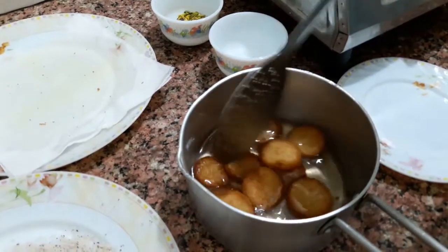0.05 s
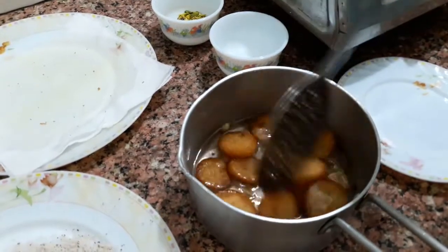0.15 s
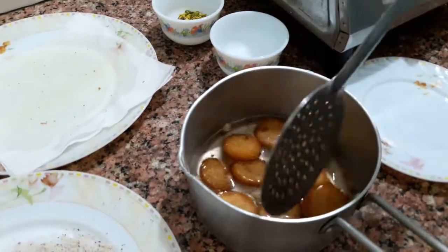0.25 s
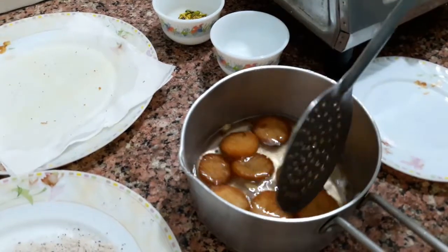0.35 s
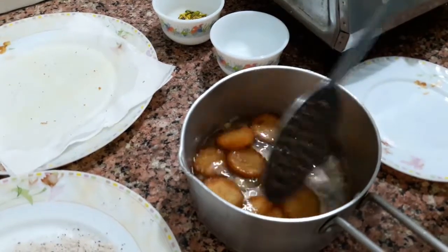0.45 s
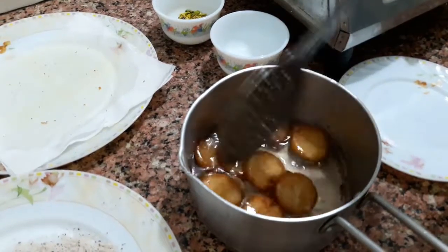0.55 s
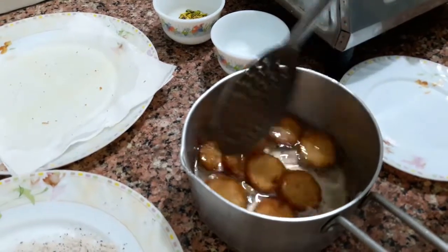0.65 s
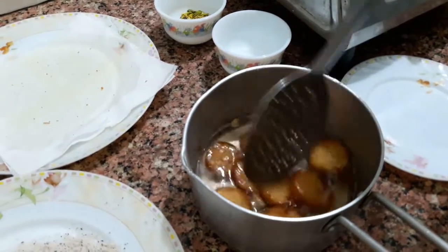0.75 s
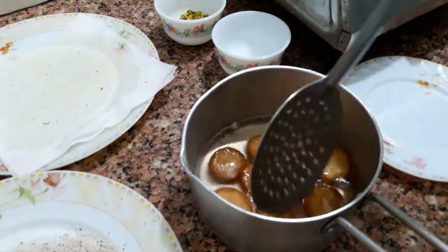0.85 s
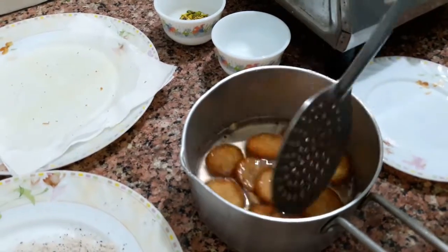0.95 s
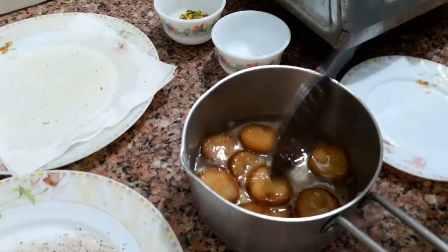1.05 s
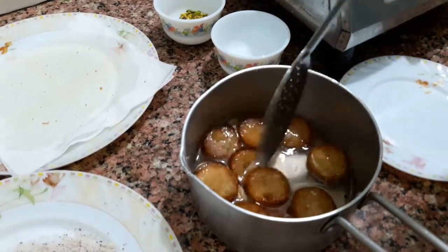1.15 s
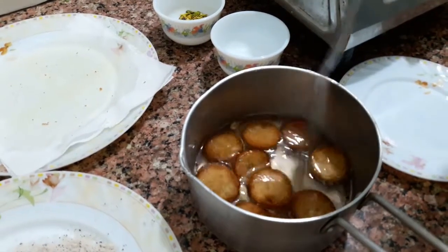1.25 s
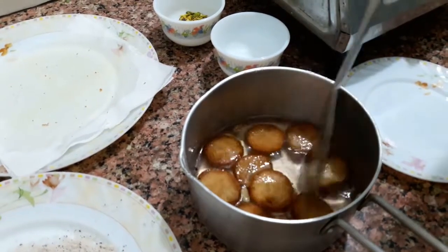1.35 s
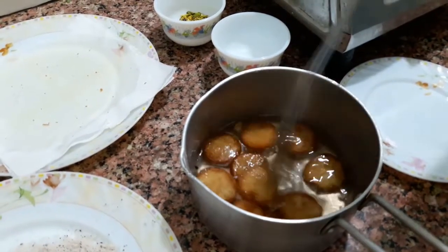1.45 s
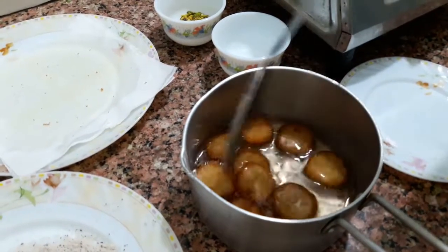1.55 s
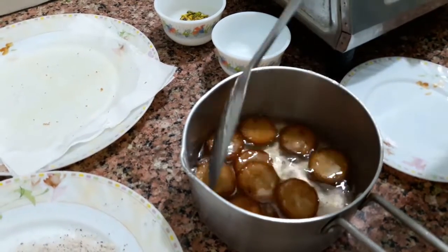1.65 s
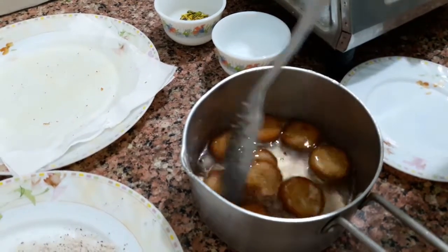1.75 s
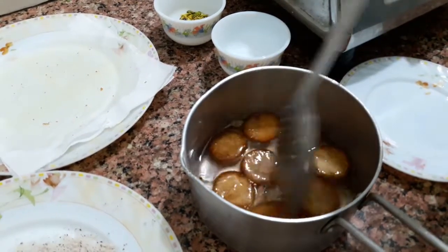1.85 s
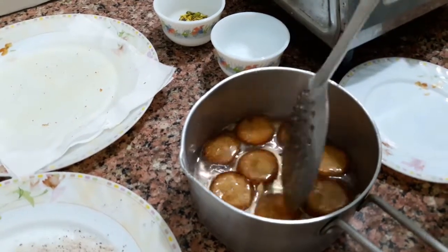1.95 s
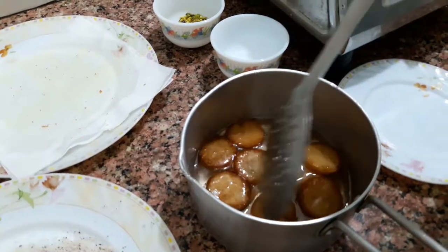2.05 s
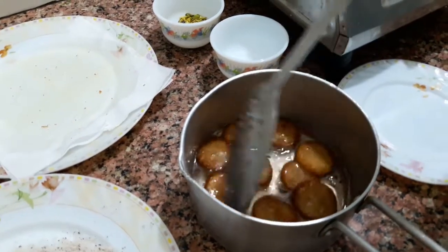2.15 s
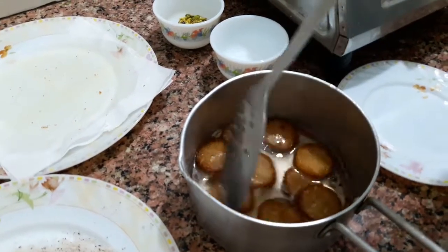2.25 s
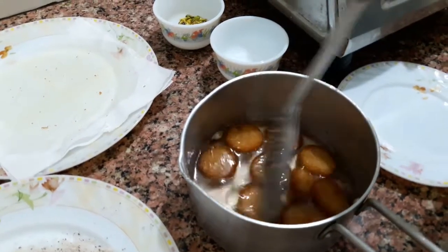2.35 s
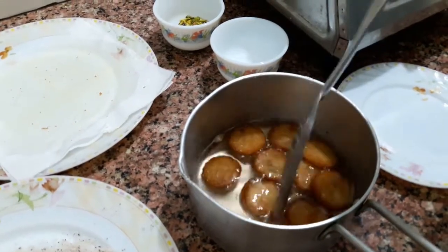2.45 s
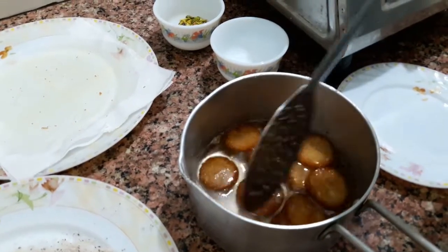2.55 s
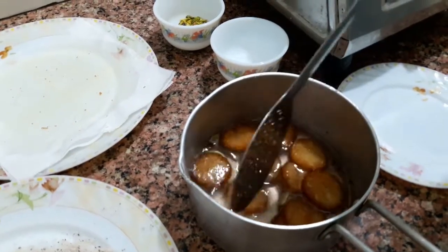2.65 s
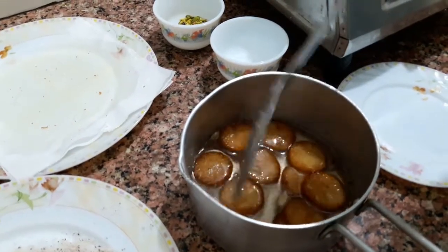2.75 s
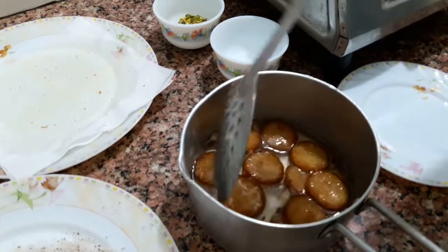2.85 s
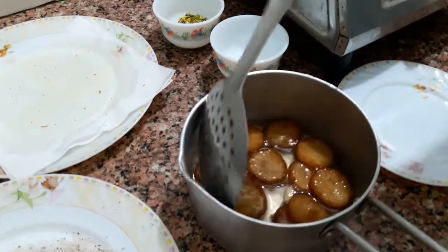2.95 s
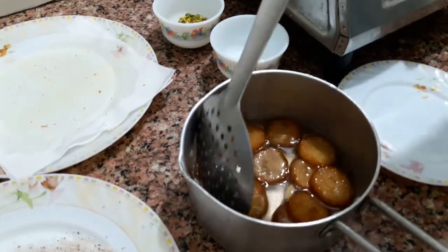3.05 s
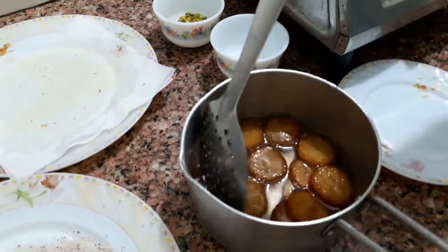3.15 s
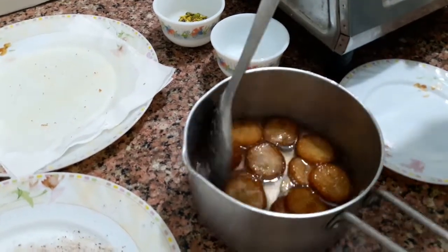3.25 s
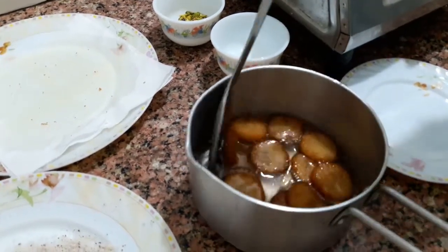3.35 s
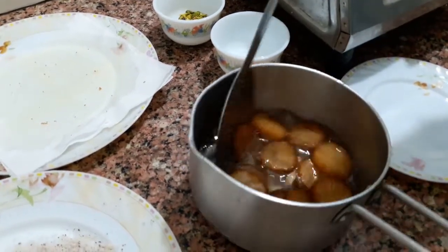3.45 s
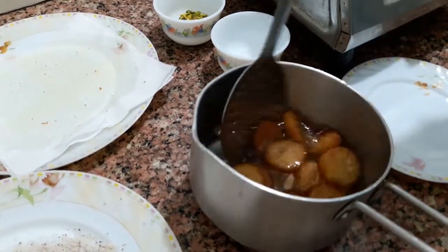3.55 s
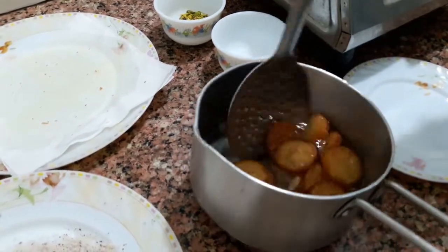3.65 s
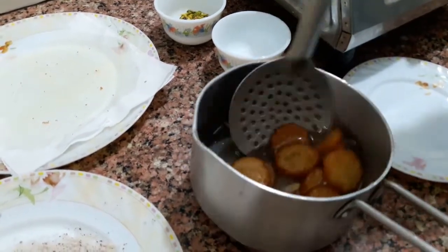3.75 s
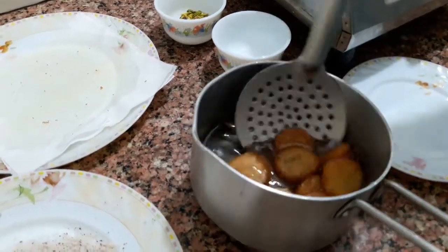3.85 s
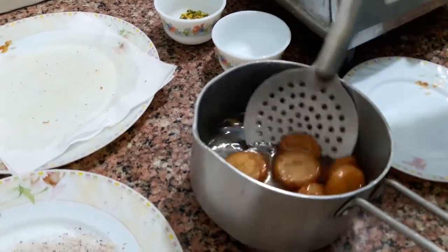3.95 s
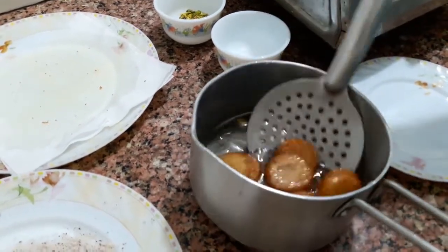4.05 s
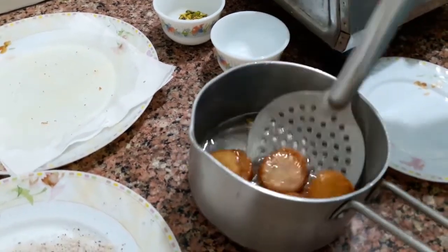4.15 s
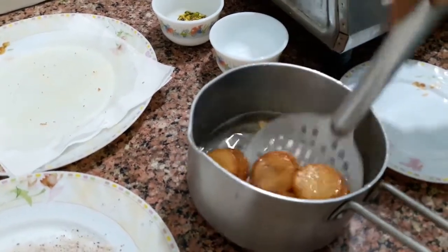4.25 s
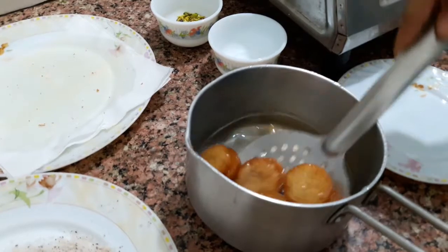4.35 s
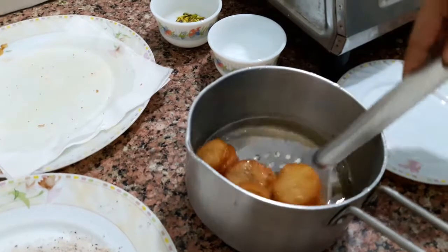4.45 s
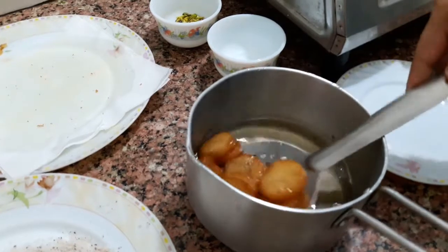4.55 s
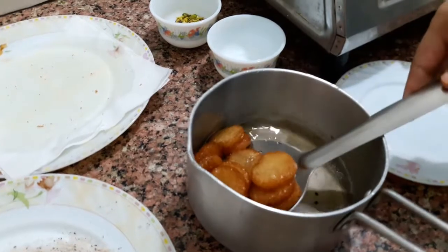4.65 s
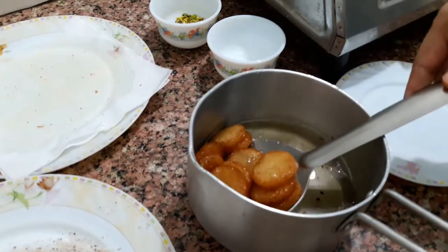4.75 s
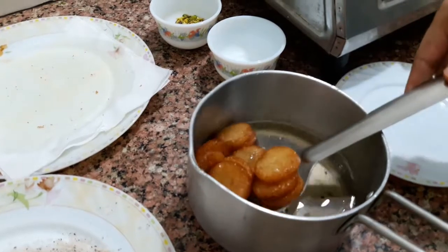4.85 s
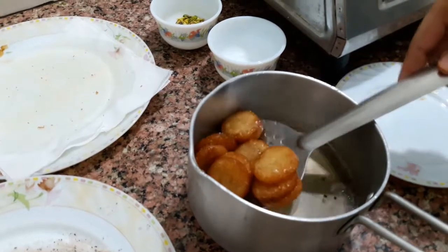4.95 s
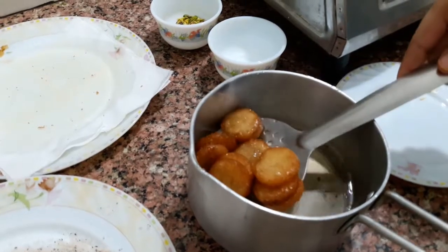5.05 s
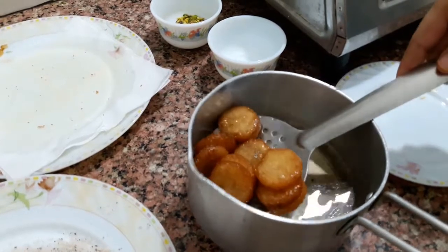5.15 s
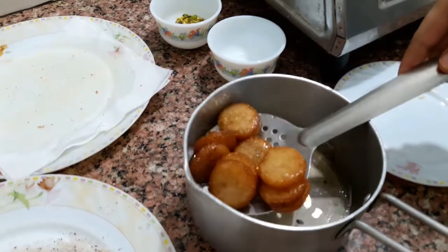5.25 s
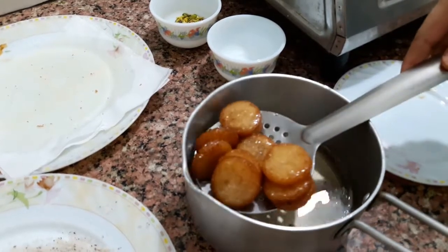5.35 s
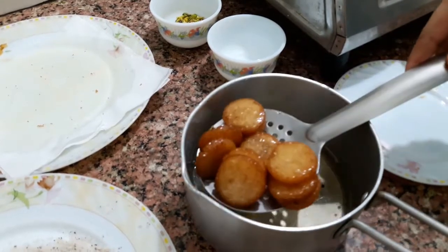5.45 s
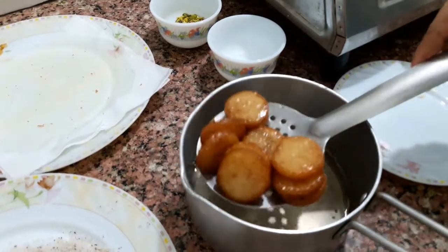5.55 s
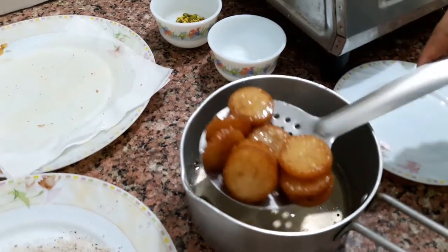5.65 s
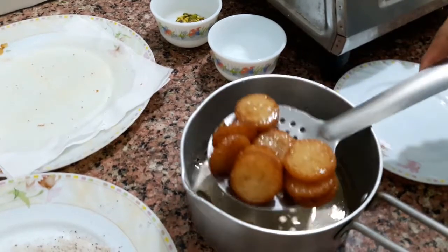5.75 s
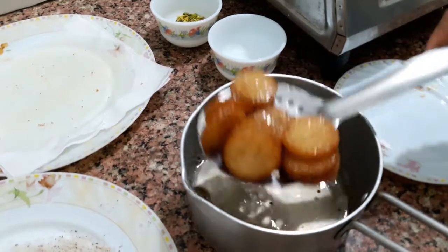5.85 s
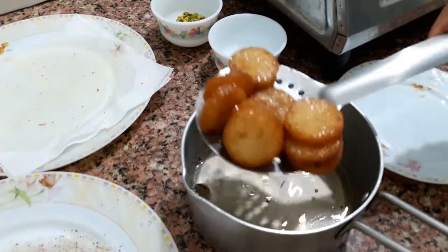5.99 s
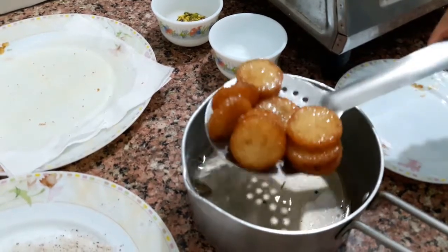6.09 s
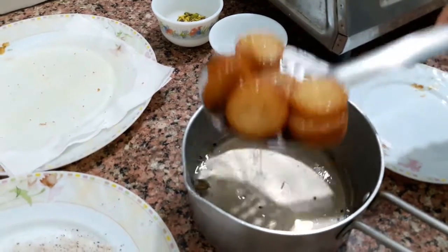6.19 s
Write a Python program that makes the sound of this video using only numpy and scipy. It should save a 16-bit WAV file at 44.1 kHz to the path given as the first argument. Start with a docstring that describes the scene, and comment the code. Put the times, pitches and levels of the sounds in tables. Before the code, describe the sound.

Light metallic taps and duller knocks in a syrupy pan, one bright clang, a grinding metal scoop, then a tick and tiny drips.

```python
"""In a small kitchen, a slotted steel skimmer nudges fried sweets around a saucepan of syrup.
It tinkles on the side, knocks on the bottom, clangs once on the wall and scrapes up the sweets.
Blows are noise cracks with dying modes; scraping is stick-slip clicks through resonances.
Syrup bubbles and drips are rising sines; filtered noise makes the air, wavering sines an appliance's hum.
"""
import sys
import numpy as np
from scipy import signal
from scipy.fft import rfft, irfft
from scipy.io import wavfile

SR = 44100
rng = np.random.default_rng(int(sys.argv[2]) if len(sys.argv) > 2 else 0)


def wav_record(signal):
    """Record a signal, one row per channel, as 16-bit PCM in the file named by sys.argv[1]."""
    frames = np.transpose(np.atleast_2d(signal))
    bounded = np.clip(frames, -1, 1)
    # unit amplitude maps onto the largest positive 16-bit level
    quanta = np.round(bounded * 32767).astype(np.int16)
    wavfile.write(sys.argv[1], SR, quanta)


N = 274283
TIME = np.arange(N) / SR
SHORT = TIME[:SR * 2 // 3]  # time axis of one ring or echo


def gain_of(db):
    """Level law: decibels to amplitude."""
    return 10 ** (np.asarray(db) / 20)


def evened(x):
    """Normalisation: scales to rms 1."""
    return x / np.sqrt(np.mean(x ** 2) + 1e-20)


def read(points, hz):
    """Interpolation of a table along a logarithmic frequency axis."""
    f, value = np.transpose(points)
    return np.interp(np.log(hz + 1), np.log(f + 1), value)


def add(mix, s, sound):
    """Superposition: mixes a sound in at time s, cutting what falls outside."""
    start = round(s * SR)
    sound = sound[max(-start, 0):]
    part = mix[max(start, 0):][:len(sound)]
    part += sound[:len(part)]


def coloured(x, *spectra, size=4096):
    """Minimum-phase filtering: a causal filter whose gain is the sum of some dB spectra."""
    hz = abs(np.fft.fftfreq(size, 1 / SR))
    log_gain = np.log(gain_of(sum(read(points, hz) for points in spectra)))
    # the Hilbert transform of the log gain gives the phase
    response = np.exp(np.conj(signal.hilbert(log_gain)))
    impulse = np.fft.ifft(response).real[:size // 2]
    return signal.fftconvolve(x, impulse)[:len(x)]


def drift(rate_hz):
    """Low-passed noise: a random wander of rms 1, slower for a lower rate."""
    hz = np.fft.rfftfreq(N, 1 / SR)
    noise = rfft(rng.standard_normal(N))
    return evened(irfft(noise * np.exp(-(hz / rate_hz) ** 2), N))


def slips(per_s, spread_db):
    """Stick and slip: random clicks of either sign, with sizes spread upwards or downwards in dB."""
    size = gain_of(spread_db * np.minimum(rng.exponential(1, N), 4))
    happens = rng.random(N) < per_s / SR
    return evened(size * rng.choice([-1, 1], N) * happens)


def resonate(x, hz, width):
    """Resonance by heterodyning: a one-pole filter around the moving frequency hz."""
    turn = np.exp(2j * np.pi * np.cumsum(hz) / SR)
    r = np.exp(-np.pi * width / SR)
    return (turn * signal.lfilter([1 - r], [1, -r], x / turn)).real


# Colour of the steady air. Each row: frequency in Hz, gain in dB.
AIR_COLOUR = [(15, -66), (25, -28), (70, -16.5), (87, -3.5), (175, -5), (206, -17.5), (236, -8), (263, -18),
              (317, -2), (384, -14.5), (463, -9.5), (607, -15.5), (796, -12.5), (936, -11.5), (1020, -15.5),
              (1940, -19), (2110, -21), (3920, -35.5), (8590, -42.5), (12900, -44.5), (16000, -50)]
AIR_DB = -49.5  # rms before the slow drift


def air():
    """Broadband noise: a filtered rush whose level drifts a little."""
    rush = evened(coloured(rng.standard_normal(N), AIR_COLOUR, size=16384))
    return gain_of(AIR_DB) * rush * gain_of(.5 * drift(rate_hz=6.2))


# Tones of the appliance. Each row: mean frequency in Hz, middle of the wandering level in dB.
HUM_TONES = [(100, -61.5), (176, -58), (308, -61.5)]


def appliance_hum():
    """Frequency and amplitude modulation: sines that waver in pitch and level."""
    hum = np.zeros(N)
    for hz, db in HUM_TONES:
        level = gain_of(db + 1.4 * drift(rate_hz=12))
        pitch = hz + 5.36 * drift(rate_hz=14.4)
        hum += level * np.sin(2 * np.pi * np.cumsum(pitch) / SR)
    return hum


# Decay of the room. Each row: frequency in Hz, time to fall 60 dB in seconds.
ECHO_T60 = [(150, 0.452), (400, 0.56), (1500, 0.4), (4000, 0.36), (8000, 0.34), (14000, 0.22)]
# Strength of the echo. Each row: frequency in Hz, level in dB relative to the sound sent in.
ECHO_LEVEL = [(150, -0.5), (400, 5), (1200, -1), (3000, -3.5), (6000, -3.5), (12000, -3.5)]


def kitchen(x, first_s=0.0018):
    """Diffuse reverberation: dense reflections off counter and tiles, the high treble dying first."""
    hz, t, z = signal.stft(rng.standard_normal(len(SHORT)), SR, nperseg=256)
    decay = np.log(1000) / read(ECHO_T60, hz)[:, None]
    level = np.sqrt(2 * decay / SR) * gain_of(read(ECHO_LEVEL, hz))[:, None]
    z = z * np.exp(-decay * t) * level
    tail = signal.istft(z, SR, nperseg=256)[1][:len(SHORT)]
    # the echo fades in around the first reflection
    return signal.fftconvolve(x, tail * np.clip(SHORT / first_s - .5, 0, 1))[:N]


# The long slide: the skimmer presses steadily, eases off to a light touch, then leaves the pan.
PRESS_S, EASE_S, LIFT_S = 3.33, 4.35, 5.2  # when each stage begins
PRESS_RISE_S, EASE_FALL_S, LIFT_FALL_S = 0.026, 0.32, 0.11
PRESS_DB, TOUCH_DB, OFF_DB = -42, -54, -91


def pressure_db(t):
    """Friction grows with contact pressure: press, hold, ease off, lift."""
    stages = [PRESS_S, PRESS_S + PRESS_RISE_S, EASE_S, EASE_S + EASE_FALL_S,
              LIFT_S, LIFT_S + LIFT_FALL_S]
    return np.interp(t, stages, [OFF_DB, PRESS_DB, PRESS_DB, TOUCH_DB, TOUCH_DB, OFF_DB])


BUBBLE_CYCLES = 58  # a bubble falls 60 dB in this many starting periods, so small ones are brief


def bubble(hz, t60, rise=2.05, onset_s=0.00022):
    """Volume resonance: a bubble rings briefly, its pitch rising as it nears the surface."""
    t = SHORT[:SR // 8]
    fade = np.exp(-np.log(1000) * t / t60) * (1 - np.exp(-t / onset_s))
    return fade * np.sin(2 * np.pi * hz * (t + rise * t ** 2))


# The clearest bubbles. Each row: start in seconds, starting pitch in Hz, level in dB.
CLEAR_BUBBLES = [(0.738, 643, -36), (0.748, 856, -35), (1.845, 1580, -28), (2.686, 1483, -37),
                 (4.181, 1990, -30.5), (4.273, 1680, -26), (4.386, 3520, -32), (4.475, 826, -32),
                 (4.931, 3010, -26), (4.945, 1996, -23)]


def plops():
    """Damped bubble resonance: single bubbles in the syrup."""
    out = np.zeros(N)
    for s, hz, db in CLEAR_BUBBLES:
        add(out, s, gain_of(db) * bubble(hz, BUBBLE_CYCLES / hz))
    return out


# Small bubbles stirred up by the slide.
GURGLE_HZ, GURGLE_OCTAVES = 714, 2  # lowest starting pitch and range
GURGLE_DB = 7  # the loudest, relative to the pressure level
GURGLE_SPREAD_DB, GURGLE_DB_PER_OCTAVE = 2, -3.5


def gurgle(count=70):
    """Random superposition of small bubbles whose level follows the push of the skimmer."""
    out = np.zeros(N)
    for when, smallness, weakness in rng.random((count, 3)):
        s = PRESS_S + when * (LIFT_S - PRESS_S)
        octaves = GURGLE_OCTAVES * smallness
        hz = GURGLE_HZ * 2 ** octaves
        db = pressure_db(s) + GURGLE_DB - GURGLE_SPREAD_DB * weakness
        db += GURGLE_DB_PER_OCTAVE * octaves
        add(out, s, gain_of(db) * bubble(hz, BUBBLE_CYCLES / hz))
    return out


# Colour of a landing drop. Each row: frequency in Hz, gain in dB.
SPLASH_COLOUR = [(500, -25), (2500, -3), (4200, 5), (5500, -6), (8000, -17), (12000, -25)]
DRIP_T60_S, DRIP_SWELL_S = 0.086, 0.0022
SPLASH_DB, SPLASH_S = 5.5, 0.003  # gain of the landing tick over its bubble, time constant


def drip(hz):
    """Impact and entrainment: a drop ticks on the syrup while its bubble swells and rings."""
    tone = bubble(hz, DRIP_T60_S, onset_s=DRIP_SWELL_S)
    tick = np.exp(-SHORT[:len(tone)] / SPLASH_S) * rng.choice([-1, 1], len(tone))
    return tone + gain_of(SPLASH_DB) * coloured(tick, SPLASH_COLOUR)


# Syrup dripping back from the lifted skimmer.
# Each row: start in seconds, starting pitch in Hz, bubble level in dB.
FALLING_DRIPS = [(5.636, 3950, -39), (5.640, 2900, -43.5), (5.717, 2950, -40.5)]


def drips():
    """Entrained-bubble resonance: each falling drop traps a bubble."""
    out = np.zeros(N)
    for s, hz, db in FALLING_DRIPS:
        add(out, s, gain_of(db) * drip(hz))
    return out


def strokes(rows, shape, per_s, lumpy_db):
    """Modulated friction: short bell-shaped swells of clumped slips."""
    # the length spans the points where the swell is 1/e of its height
    force = sum(gain_of(db) * np.exp(-(2 * (TIME - s) / length) ** 2) for s, length, db in rows)
    clumped = slips(per_s, spread_db=-2.0) * gain_of(lumpy_db * drift(rate_hz=140))
    return force * evened(coloured(clumped, shape))


# Sweets shifting. Each row: peak time in seconds, length in seconds, level in dB before a 6 dB cut.
SLOSH_SWELLS = [(0.745, 0.063, -41), (2.69, 0.077, -43.5), (3.04, 0.031, -46.5)]
# Colour of a slosh. Each row: frequency in Hz, gain in dB.
SLOSH_COLOUR = [(60, -24), (200, 3), (350, -7), (700, 2), (1500, -4.5), (2500, -29), (6000, -36.5),
                (16000, -61.5)]


def sloshes():
    """Low-pitched granular friction: sweets shift in the syrup."""
    return gain_of(-6) * strokes(SLOSH_SWELLS, SLOSH_COLOUR, per_s=400, lumpy_db=3)


def ring(modes, spread_db):
    """Modal decay: dying sines; the point of contact changes the share of each."""
    hz, db, t60 = np.transpose(modes)[:, :, None]
    share, phase = rng.standard_normal(hz.shape), rng.random(hz.shape)
    fade = gain_of(db + spread_db * share) * np.exp(-np.log(1000) * SHORT / t60)
    return (fade * np.sin(2 * np.pi * (hz * SHORT + phase))).sum(0)


def blows(rows, clack_shape, modes, clack_db, ring_db, crack_s, rattle_s, rattle_db, spread_db):
    """Impact excitation: a crack, a brief rattle of dense modes, then the clear ring of the steel."""
    clacks, rings = np.zeros((2, N))
    t = SHORT[:SR // 6]
    fade = np.exp(-t / crack_s) + gain_of(rattle_db) * np.exp(-t / rattle_s)
    # bending waves take a moment to spread over the steel
    fade = fade * (1 - np.exp(-t / 0.0012))

    def strike(s, db, treble_db, extra_db=0, thud_db=0):
        """Contact stiffness: a hard contact wakes the high modes, a heavy one the low modes."""
        contact = [(450, thud_db), (900, 0), (3200, 0), (4800, treble_db)]
        clack = coloured(fade * rng.choice([-1, 1], len(t)), clack_shape, contact)
        add(clacks, s, gain_of(db + clack_db) * clack)
        clear_ring = coloured(ring(modes, spread_db), contact)
        add(rings, s, gain_of(db + ring_db + extra_db) * clear_ring)

    for row in rows:
        strike(*row)
    return np.array([clacks, rings])


# Light touches. Each row: start in seconds, level in dB before the clack and ring gains,
# treble in dB, extra ring in dB.
TAP_ROWS = [(-0.04, -36.5, -6.5, 4.5), (0.1175, -27.5, -5.5, -3), (0.1362, -19.5, -13.5, 6.5),
            (0.2039, -30, -15.5, 13), (0.2312, -30, -2.5, -4), (0.4100, -31, -4, -2), (0.4311, -27, -13, 6),
            (0.4506, -24, -14, -20), (0.5056, -32.5, -4, 1.5), (0.7185, -33, -9, -7),
            (0.7375, -28, -8.5, -16), (0.8018, -28.5, -12, 15.5), (1.0715, -38, -11.5, -13),
            (1.1277, -33.5, -16, 10), (1.4792, -26.5, -5.5, -5), (1.6972, -34.5, -2, -15),
            (1.7655, -26.5, -7, -18), (1.8450, -33, -7.5, 9), (1.8710, -29, -3.5, -12),
            (2.3020, -33.5, -2, -11), (2.6350, -34.5, -9.5, 7), (3.0965, -39.5, -1, -10)]
# Dense, quickly dying modes of a tap. Each row: frequency in Hz, gain in dB.
TAP_COLOUR = [(80, -33.5), (250, -7), (800, -2), (1700, 0.5), (2400, -9), (4000, -6), (4700, -2.5),
              (6500, -5.5), (9000, -13.5), (10000, -17), (11200, -17), (12500, -23), (16000, -16.5)]
# Modes of the free skimmer. Each row: frequency in Hz, mean level in dB, 60 dB decay in seconds.
SKIMMER_MODES = [(2548, -16, .2), (3149, -21, .2), (3774, -24, .25), (4576, 0, .17), (4696, -3, .2),
                 (5498, -3, .26), (5572, -8, .3), (5916, -9, .26), (6944, -8, .28), (7078, -5, .33),
                 (8753, -10, .24), (8990, -7, .26), (10990, -20, .18), (11400, -21, .16), (12720, -25, .18)]


def taps():
    """Free vibration: light touches leave the skimmer ringing."""
    return blows(TAP_ROWS, TAP_COLOUR, SKIMMER_MODES, clack_db=8.0, ring_db=-10.5,
                 crack_s=0.0025, rattle_s=0.01, rattle_db=-9.5, spread_db=3.0)


# Chatter along the side. Each row: start in seconds, end in seconds, level of the slips in dB
# before the colour and the rasp and ring gains.
CHATTER_RUNS = [(0.139, 0.227, -38), (0.396, 0.54, -52.5), (0.72, 0.788, -42), (1.4, 1.456, -42),
                (1.762, 1.865, -38), (2.287, 2.354, -39.5), (3.134, 3.267, -58.5)]


def chatter():
    """Repeated excitation: short runs of slips along the side keep the free skimmer ringing."""
    force = np.zeros(N)
    for start, end, db in CHATTER_RUNS:
        edges = [start - .005, start, end, end + 0.0052]
        force += gain_of(db) * np.interp(TIME, edges, [0, 1, 1, 0])
    contact = [(2000, -2.5), (5000, -2.0), (11000, -3.5)]
    drive = coloured(force * slips(per_s=420, spread_db=6.0), contact)
    steel = ring(SKIMMER_MODES, spread_db=8.0)
    rasp = gain_of(0.5) * coloured(drive, TAP_COLOUR)
    ringing = signal.fftconvolve(drive, steel / np.linalg.norm(steel))[:N]
    return np.array([rasp, gain_of(-9.5) * ringing])


# The edge lands under the syrup. Each row: start in seconds, level in dB before the clack and
# ring gains, treble in dB, extra ring in dB, thud in dB.
KNOCK_ROWS = [(1.3384, -16.5, -5.5, -1.5, -1), (1.7230, -27, -10.5, 4.5, -0.5),
              (2.1415, -21, 0, -3.5, -4.5), (2.3519, -18.5, -0.5, -6, 1), (2.3635, -19.5, -15, -1, -9),
              (2.9329, -24, -11, -2.5, 1), (2.9850, -40, -16, 6.5, 4.5)]
# Dense, quickly dying modes of a knock. Each row: frequency in Hz, gain in dB.
KNOCK_COLOUR = [(60, -11), (220, -10.5), (330, 1.5), (650, 1), (1000, -1), (1900, 0), (3000, -4),
                (3800, -3.5), (4500, -0.5), (6200, -2), (9000, -11), (10300, -24), (12000, -24.5),
                (16000, -33.5)]
# Modes of the pan's bottom. Each row: frequency in Hz, mean level in dB, 60 dB decay in seconds.
BOTTOM_MODES = [(307, -4, .5), (342, -3, .28), (381, -7, .26), (450, -9, .2), (548, -12, .3),
                (1010, -8, .2), (1120, 3, .28), (1370, -11, .2), (1830, -9, .15), (2008, -8, .22),
                (2570, -9, .18), (3079, -8, .12), (4350, 0, .15), (4694, 1, .2), (5572, -4, .24),
                (5912, -1, .2), (7230, -7, .2), (8850, -12, .2)]


def knocks():
    """Plate modes: the skimmer's edge lands on the pan's bottom, some landings in close pairs."""
    return blows(KNOCK_ROWS, KNOCK_COLOUR, BOTTOM_MODES, clack_db=7.0, ring_db=-12,
                 crack_s=0.0039, rattle_s=0.015, rattle_db=-13.5, spread_db=1.5)


# The blow on bare wall. Each row: start in seconds, level in dB before the clack and ring gains,
# treble in dB.
CLANG_ROWS = [(3.2799, -7, -6)]
# Dense, quickly dying modes of the clang. Each row: frequency in Hz, gain in dB.
WALL_COLOUR = [(80, -48), (260, -6), (500, -13.5), (850, -1.5), (1200, -2.5), (2500, 3.5), (3300, 5.5),
               (3900, -16.5), (5200, 5.5), (7100, -8.5), (7600, -11), (8700, -12.5), (11500, -31),
               (16000, -38)]
# Modes of the pan's wall. Each row: frequency in Hz, mean level in dB, 60 dB decay in seconds.
WALL_MODES = [(809, -3, .3), (951, -5, .28), (1462, -7, .28), (1598, -6, .28), (1697, -9, .2),
              (1899, -8, .18), (2113, -1, .24), (2232, -6, .24), (2404, -7, .3), (2514, 1, .16),
              (2680, 0, .22), (2775, -4, .18), (3132, -5, .25), (3232, -2, .23), (3347, -4, .25),
              (4494, 15, .09), (5190, -4, .22), (5320, -2, .17), (6169, -9, .18), (7004, -4, .18),
              (8188, -13, .14)]


def clangs():
    """Shell modes: the skimmer strikes the bare wall."""
    return blows(CLANG_ROWS, WALL_COLOUR, WALL_MODES, clack_db=7.0, ring_db=-18.0,
                 crack_s=0.0034, rattle_s=.016, rattle_db=-13, spread_db=2.0)


# Catches on the pan. Each row: start in seconds, level in dB before the clack and ring gains,
# treble in dB, extra ring in dB.
TICK_ROWS = [(3.6204, -29.5, -30, -16), (3.7650, -34.5, -12, -12), (4.1808, -35.5, -17, -13),
             (4.2706, -32, -5, 1), (4.2975, -28.5, -10, -12), (4.3693, -34.5, -6, -8),
             (4.3875, -41, -18, -15), (4.6372, -28, -5, 9), (4.9310, -39, -3, 0), (5.1530, -32, -20, -4),
             (5.7611, -26, -12, -5)]
# Dense, quickly dying modes of a tick. Each row: frequency in Hz, gain in dB.
TICK_COLOUR = [(80, -12), (300, 2.5), (800, -4), (1600, 4), (2300, -3.5), (3100, -3.5), (3900, -1.5),
               (4700, 2), (7000, 1.5), (9000, -12.5), (12000, -22), (16000, -63)]
# Modes of the loaded skimmer. Each row: frequency in Hz, mean level in dB, 60 dB decay in seconds.
LOADED_MODES = [(1300, -9, .08), (1700, -9, .08), (2690, 5, .07), (3170, -1, .08), (4560, -3, .1),
                (4780, -3, .06), (5900, -1, .05), (6550, -6, .12), (7100, -2, .14)]


def ticks():
    """Damped vibration: the skimmer, deadened by its load, catches on the pan."""
    return blows(TICK_ROWS, TICK_COLOUR, LOADED_MODES, clack_db=8.0, ring_db=-18.5,
                 crack_s=0.0025, rattle_s=0.011, rattle_db=-13.5, spread_db=3.0)


# Shoves under the sweets. Each row: peak time in seconds, length in seconds, level in dB
# before a 1.5 dB cut.
SHOVE_SWELLS = [(3.455, 0.021, -39), (3.545, 0.014, -40.5), (4.29, 0.052, -37), (4.392, 0.028, -30),
                (4.95, 0.049, -31)]
# Colour of a shove. Each row: frequency in Hz, gain in dB.
SHOVE_COLOUR = [(100, -49), (400, -13.5), (800, 3), (1200, -2), (1700, 6.5), (2050, -1), (2450, -11),
                (3100, -2), (3900, -7), (5500, -14.5), (7000, -12.5), (9000, -20.5), (12000, -37),
                (16000, -50)]


def shoves():
    """Bursts of dry friction: hard shoves under the sweets."""
    return gain_of(-1.5) * strokes(SHOVE_SWELLS, SHOVE_COLOUR, per_s=1100, lumpy_db=1.5)


# Colour of the low grinding. Each row: frequency in Hz, gain in dB.
GRIND_COLOUR = [(150, -42.5), (250, -18.5), (319, 1.5), (464, -6), (625, -7.5), (714, -21), (815, 6.5),
                (1370, -3.5), (1550, 11.5), (1870, -5.5), (2040, 4), (2780, -33.5), (3500, -36),
                (4550, -38), (7700, -120)]
# Colour of the fine grit. Each row: frequency in Hz, gain in dB.
GRIT_COLOUR = [(1400, -21), (2500, 6.5), (2850, -10.5), (3200, 4.5), (3750, -8), (4300, -5.5), (5500, -11),
               (6900, -4), (7600, -13.5), (9100, -9), (10000, -24), (11200, -26), (14000, -45.5)]
# Modes of the pan under the pressing skimmer.
# Each row: mean frequency in Hz, width in Hz, level in dB relative to the other modes.
PRESSED_MODES = [(329.3, 14, 0.5), (599, 36, -2), (908, 50, -2), (1296, 40.6, -6), (1630, 40, -12),
                 (2105, 21.6, -5), (4230, 350, -2.5)]
# Grit grows as the rim climbs from the syrup onto bare steel.
CLIMB_S, BARE_S = 4.04, 4.16
GRIT_WET_DB, GRIT_BARE_DB = -19, -10  # relative to the pressure level


def scoop():
    """Stick-slip friction: the loaded skimmer grinds over the pan's damped modes, with fine grit on top."""
    drive = evened(slips(per_s=1200, spread_db=0.0) * gain_of(0.67 * drift(rate_hz=98)))
    body = np.zeros(N)
    for hz, width, db in PRESSED_MODES:
        # the resonances wander as the point of contact travels
        moving_hz = hz * (1 + .018 * drift(rate_hz=7.1))
        body += gain_of(db) * evened(resonate(drive, moving_hz, width))
    grind = gain_of(-9.0) * evened(coloured(drive, GRIND_COLOUR)) + gain_of(-12.0) * evened(body)
    grit_gain = gain_of(np.interp(TIME, [CLIMB_S, BARE_S], [GRIT_WET_DB, GRIT_BARE_DB]))
    grit = grit_gain * evened(coloured(drive, GRIT_COLOUR))
    return gain_of(pressure_db(TIME)) * (grind + grit)


# Microphone response. Each row: frequency in Hz, gain in dB.
MIC_RESPONSE = [(30, -12), (70, 0.5), (11400, 0.5), (12300, -11), (16000, -11)]


def scene():
    """Superposition of steel, syrup and room at one point above the pan."""
    clacks, rings = taps() + knocks() + clangs() + ticks() + chatter()
    broad = clacks + scoop() + shoves() + sloshes()
    bubbles = plops() + drips() + gurgle()
    # the bubbles and clear rings send less into the room
    room = kitchen(broad + gain_of(-3.5) * bubbles + gain_of(-13) * rings)
    heard = coloured(broad + bubbles + rings + room, MIC_RESPONSE)
    return np.tile(heard + air() + appliance_hum(), (2, 1))


def record(dry):
    """Noise floor and band limit: a trace of hiss in each channel, then a low-pass."""
    hiss = gain_of(-73.5) * rng.standard_normal(dry.shape)
    low_pass = signal.firwin(511, 15850, window=("kaiser", 9), fs=SR)  # cutoff in Hz
    return signal.oaconvolve(dry + hiss, low_pass[None], "same")


dry = scene()
out = record(dry)
wav_record(out)
```